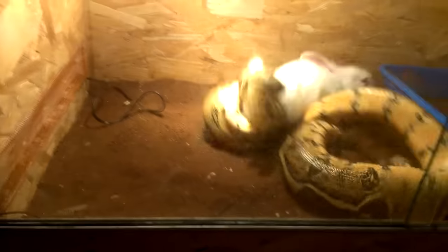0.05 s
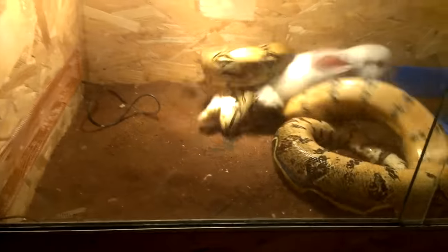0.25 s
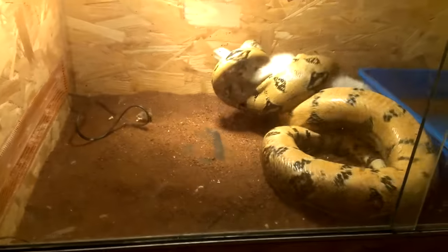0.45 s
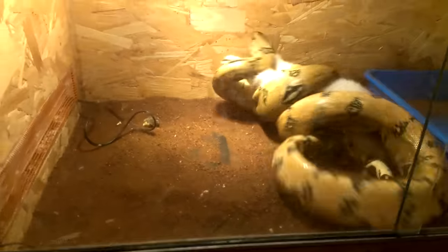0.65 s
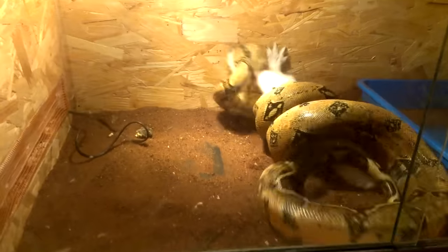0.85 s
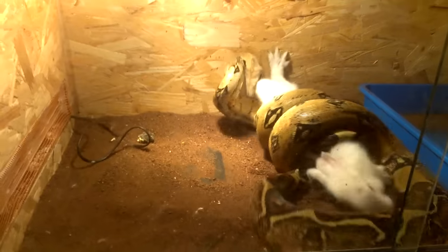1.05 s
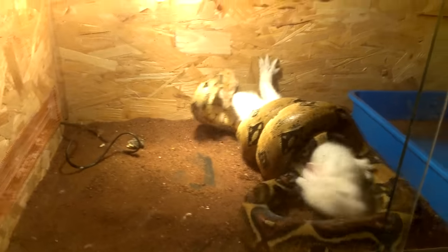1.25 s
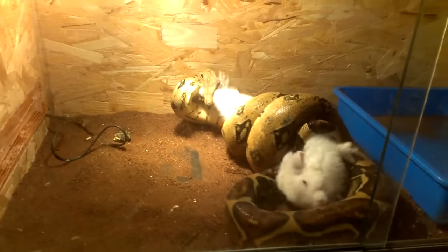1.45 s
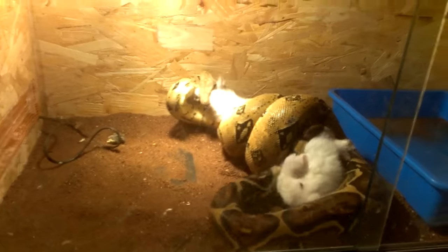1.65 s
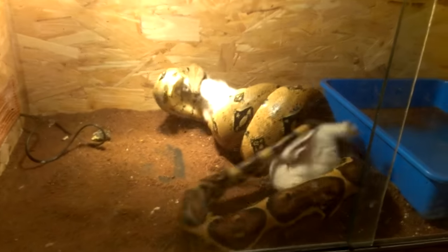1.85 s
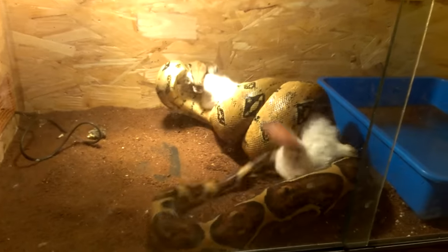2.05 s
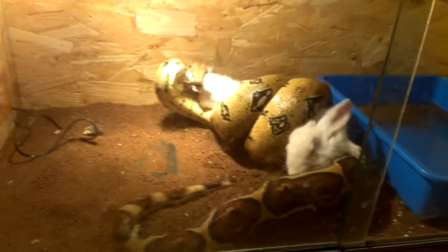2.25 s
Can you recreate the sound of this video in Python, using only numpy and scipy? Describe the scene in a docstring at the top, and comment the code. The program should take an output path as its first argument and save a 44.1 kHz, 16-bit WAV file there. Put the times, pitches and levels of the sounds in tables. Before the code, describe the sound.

A rabbit screams, a shrill squeal breaking into hoarse rasping cries, over faint thumps.

```python
"""A rabbit screaming in its enclosure

A whistling squeal glides around 3 kHz and breaks into a lower rasp, made of uneven voice pulses and air.
A second rasping cry follows and trails off in hoarse hisses. The close wood and glass walls echo the
cries, while the struggling rabbit thumps the boards and scuffs the bedding."""
import sys
import numpy as np
from scipy import signal
from scipy.fft import rfft, irfft
from scipy.io import wavfile
from scipy.ndimage import uniform_filter1d

SR = 44100
rng = np.random.default_rng(int(sys.argv[2]) if len(sys.argv) > 2 else 0)


def waveform_to_disk(signal):
    """Save audio, clipped to [-1, 1], as 16-bit WAV at the path in sys.argv[1]."""
    frames = np.transpose(np.atleast_2d(signal))
    scaled = np.clip(frames, -1, 1) * 32767
    samples = np.round(scaled).astype(np.int16)
    wavfile.write(sys.argv[1], SR, samples)


N = 101429
T = np.arange(N) / SR

# The squeal's tune. Each row: time in seconds, pitch in Hz.
SQUEAL_PITCH = [(.16, 2620), (.178, 3057), (.208, 3260), (.272, 3424), (.293, 3104), (.318, 3052),
                (.324, 2886), (.337, 2928), (.348, 3168), (.39, 2894), (.398, 2666), (.425, 2762),
                (.484, 3470), (.503, 3504), (.512, 3822), (.56, 4006), (.595, 4020), (.598, 3480),
                (.62, 3310), (.645, 2692), (.67, 2605), (.725, 3161), (.78, 3096)]
# The squeal's strength. Each row: time in seconds, then relative levels in dB near 3, 6 and 9 kHz.
SQUEAL_LEVELS = [(.157, -71, -55, -65), (.178, -54, -36, -57), (.228, -35.5, -34, -53.5),
                 (.27, -20, -22, -41), (.296, -38.5, -31, -38.5), (.335, -29, -18, -32.5),
                 (.364, -17, -37, -34), (.402, -41, -30.5, -57), (.445, -34, -36.5, -44),
                 (.492, -16, -38, -47), (.515, -32, -48, -29), (.575, -20.5, -31, -35.5),
                 (.59, -36, -43, -45), (.6, -20, -33, -42.5), (.625, -30.5, -34, -41.5),
                 (.69, -35.5, -23, -40), (.748, -24, -36.5, -36.5), (.762, -37, -33, -46)]
# Where those three bands blend, in Hz: low to middle (from, to), then middle to high (from, to).
BAND_EDGES_HZ = [4200, 5180, 6750, 7200]
# How rough the squeal is. Each row: time in seconds, roughness from 0 to 1.
SQUEAL_ROUGHNESS = [(.22, 0.28), (.27, 0), (.295, 0.23), (.335, 0.35), (.37, 0.05), (.45, 0.2), (.495, 0),
                    (.507, 0.74), (.575, 0.52), (.595, 0.8), (.61, 0.11), (.7, 0.29), (.75, 0.06)]
# The voice in each rasp. Each row: time in seconds, pitch in Hz, roughness from 0 to 1.
RASP1_VOICE = [(.755, 1206, 0.505), (0.799, 1047, 0.8), (0.83, 1077, 0.71), (.855, 912, .6),
               (0.878, 999.6, 0.32), (.903, 989.5, 0.39), (.925, 911.3, 0.53), (0.95, 1000, 0.53),
               (0.963, 948.5, 0.7), (0.983, 973, 0.32), (1.007, 904, 1), (1.04, 900, 0.85)]
RASP2_VOICE = [(1.369, 837.5, 0.74), (1.43, 759.3, 0.52), (1.466, 714.4, 0.59), (1.51, 819.8, 0.77),
               (1.559, 808, .8), (1.612, 802.7, 0.47), (1.645, 874.4, 0.51), (1.681, 945.7, 0.31),
               (1.709, 918.8, .17), (1.75, 924.7, 0.089), (1.766, 882, 0.34), (1.777, 844, 0.66),
               (1.83, 824, 0.78)]
# How the rasps, the hisses and their treble swell. Each row: time in seconds, relative level in dB.
RASP1_LEVEL = [(.748, -63), (.758, -29.5), (.838, -32.5), (.872, -28.5), (.956, -35), (.988, -29),
               (1.005, -37), (1.055, -41.5), (1.11, -75)]
RASP2_LEVEL = [(1.332, -72), (1.34, -39.5), (1.366, -33.5), (1.46, -29), (1.498, -28), (1.53, -28),
               (1.58, -33.5), (1.642, -30.5), (1.7, -34.5), (1.75, -30.5), (1.792, -31.5), (1.81, -54),
               (1.87, -72)]
HISS1_LEVEL = [(1.8, -32), (1.84, -39.5), (1.87, -45.5), (1.91, -38.5), (1.948, -37.5), (2.02, -45),
               (2.094, -57), (2.124, -49.5), (2.158, -93)]
HISS2_LEVEL = [(2.183, -88), (2.186, -46.5), (2.208, -42.5), (2.25, -54), (2.3, -45.5)]
TREBLE_LEVEL = [(1, 4.5), (1.1, -9), (1.35, 7.5), (1.48, 4), (1.8, -5), (2.13, 0.5), (2.19, -8.5),
                (2.25, 8)]
# The tone of the squeal's air and of the throat. Each row: frequency in Hz, relative level in dB.
AIR_TONE = [(2600, -26), (3400, 3.5), (5400, 4.5), (6500, -11.5), (10000, -20)]
RASP1_THROAT = [(1300, -25), (1900, -16.5), (2400, -9), (2850, 0.5), (3300, -8.5), (4200, 4.5), (4900, 4),
                (6600, -3.5), (7500, -18.5), (9000, -11), (10500, -28)]
RASP2_THROAT = [(900, -36.5), (1400, -46), (1850, -35), (2300, -31), (2800, -17), (3400, -3.5),
                (4200, -6.5), (4900, 0), (5650, -1.5), (6900, -18), (8700, -15.5), (10500, -25.5)]
HISS1_THROAT = [(1400, -50), (2800, -20), (4700, -5), (6300, -21.5), (7200, -20.5), (10500, -32.5)]
HISS2_THROAT = [(2300, -40), (3000, -20.5), (4800, -1), (6200, -17.5), (7700, -14.5), (10500, -31)]
# Brief whistles in the rasps. Each row: start and length in seconds, first and last pitch in Hz,
# relative level in dB, roughness from 0 to 1.
YELPS = [(0.752, 0.038, 4806, 4640, -26.5, 0.36), (0.785, 0.027, 4510, 4120, -32, 0.56),
         (1.027, 0.096, 2305, 2045, -68, .5), (1.346, 0.033, 2880, 3260, -43, .3),
         (1.373, 0.045, 3500, 3555, -34.5, 0.2), (1.43, 0.043, 5630, 5710, -32, 0.43),
         (1.472, 0.053, 4926, 4790, -25.5, 0.6), (1.615, .042, 4680, 5370, -32.5, 0.27)]
# Kicks on the boards. Each row: start in seconds, boom, knock and scuff levels in dB,
# seconds for the knock and scuff to fade by 60 dB.
KICKS = [(0.086, -50, -42.5, -69, 0.26), (0.23, -44.5, -41, -58, 0.14), (.31, -58.5, -72.5, -60.5, 0.34),
         (0.424, -27.5, -45, -88, 0.2), (0.561, -45.5, -63.5, -68, 0.15), (.782, -35.5, -35.5, -37.5, 0.24),
         (1.175, -78, -59, -67.5, 0.11)]
# The notes the boards ring at. Each row: frequency in Hz, relative level in dB, seconds to fade by 60 dB.
BOARD_NOTES = [(97.1, -7.5, 0.3), (166.3, -17, 0.097), (286.9, -5.5, 0.2), (381, -8, 0.13),
               (497.6, 3.5, 0.21), (720, 0, 0.23), (835, -6.5, 0.22), (1064, -7, 0.2)]
# Sharp scratches in the bedding. Each row: start in seconds, level in dB, seconds to fade by 60 dB.
SCRATCHES = [(.086, -41.5, 0.098), (1.319, -58, 0.093)]
# Shifting on the floor and rustling in the bedding. Each row: time in seconds, relative level in dB.
SHUFFLE_LEVEL = [(0, -45.5), (.3, -50.5), (.7, -57), (1.17, -58), (1.48, -61), (1.65, -77), (2.3, -79)]
BEDDING_LEVEL = [(0, -60.5), (.07, -66.5), (.2, -59.5), (1.25, -70.5), (2.3, -68.5)]
# The tone of each noise of the struggle. Each row: frequency in Hz, relative level in dB.
KNOCK_TONE = [(50, -17), (120, 2.5), (230, 4.5), (330, 4), (450, -17), (700, -27.5), (1500, -18),
              (4000, -58.5)]
SCUFF_TONE = [(200, -20.5), (450, 7.5), (800, 5.5), (1200, -2), (2000, -3), (5000, -21.5), (10000, -55.5)]
SHUFFLE_TONE = [(30, -20), (70, -0.5), (105, -2), (145, -4.5), (290, -9.5), (1200, -27.5), (4000, -46.5)]
BEDDING_TONE = [(300, -4), (2500, -4.5), (4700, 7), (6500, -7.5), (10000, -25)]
# Echoes off the walls. Each row: delay in seconds, level in dB compared with the direct sound.
WALL_ECHOES = [(.0013, -24), (.0029, -16.5), (.0047, -10), (.0071, -5)]

WOBBLE_HZ, FLUTTER_HZ = 70.46, 161  # how fast the pitch wobbles and the loudness flutters
THROAT_LOW_HZ = 1210  # the throat's sound falls away below this


def squeal(gain_db=-2, air_db=0.5, end_s=0.758, release_s=0.013, shimmer_hz=284):
    """A whistle with three harmonics, shaken in pitch and strength and joined by air as it turns rough."""
    rough, hz = curve(SQUEAL_ROUGHNESS), curve(SQUEAL_PITCH)
    phase = whistle_phase(hz, rough)
    gate = (T >= SQUEAL_LEVELS[0][0]) * (T < end_s) + decay(end_s, release_s)
    low, mid, high = (undb(curve(SQUEAL_LEVELS, column=k)) for k in range(1, 4))
    whistle = 0
    for k in range(1, 4):
        past_low = np.interp(k * hz, BAND_EDGES_HZ[:2], [0, 1])
        past_mid = np.interp(k * hz, BAND_EDGES_HZ[2:], [0, 1])
        gain = low * (1 - past_low) + mid * (past_low - past_mid) + high * past_mid
        shake = k * 0.2 * rough  # higher harmonics flutter most
        shimmer = 1 + shake * np.tanh(wander(shimmer_hz))
        whistle += gain * np.sqrt(2 / (1 + shake ** 2 / 2)) * np.sin(k * phase) * shimmer
    air = noise(AIR_TONE, low_hz=2560) * low * rough ** 2
    return (undb(gain_db) * whistle + undb(air_db) * air) * gate


def whistle_phase(hz, rough, jitter_hz=368):
    """The phase of a whistle whose pitch always wobbles a little, and jolts and jitters when rough."""
    wobble = (0.0088 + 0.03 * rough) * wander(WOBBLE_HZ)
    jitter = 0.05 * rough * wander(jitter_hz)
    return 2 * np.pi * np.cumsum(hz * (1 + wobble + jitter)) / SR


def rasp(level, voice, throat, gain_db, flutter_db=4, jitter_hz=260.8, clear_db=13.5):
    """Uneven pulses and puffs of air ring the throat; the rougher the voice, the more air."""
    rough = np.clip(curve(voice, column=2), 0, 1)
    wobble = 0.022 * rough * wander(WOBBLE_HZ)
    jitter = 0.028 * rough ** 1.505 * wander(jitter_hz)  # steadies quickly as roughness falls
    phase = 2 * np.pi * np.cumsum(curve(voice) * (1 + wobble + jitter)) / SR
    clearness = np.clip(1 - rough / 0.46, 0, 1)
    third = undb(clear_db) * clearness * np.cos(3 * phase) / 2  # this harmonic stands out when clear
    pulses = sum(np.cos(k * phase) for k in range(1, 14)) + third
    puffs = rng.standard_normal(N) * (1 + 0.8 * np.cos(phase))
    air_share = rough ** 0.89
    voiced = np.sqrt(1 - air_share ** 2) * colour(pulses, throat, THROAT_LOW_HZ)
    air = air_share * colour(puffs, throat, THROAT_LOW_HZ)
    flutter = undb(flutter_db * rough * np.tanh(wander(FLUTTER_HZ)))
    return unit((voiced + air) * flutter) * envelope(level) * undb(gain_db)


def yelps(fade_s=0.011):
    """The whistle breaks through the rasp in short glides."""
    out = 0
    for start, length, first_hz, last_hz, db, rough in YELPS:
        hz = np.interp(T, [start, start + length], [first_hz, last_hz])
        gate = np.clip(np.minimum(T - start, start + length - T) / fade_s, 0, 1)
        out += np.sqrt(2) * undb(db) * gate * np.sin(whistle_phase(hz, rough))
    return out


def hiss(level, throat, gain_db, flutter_db):
    """The voice fails and only fluttering air sounds in the throat."""
    air = rng.standard_normal(N) * undb(flutter_db * wander(FLUTTER_HZ))
    return colour(air, throat, THROAT_LOW_HZ) * envelope(level) * undb(gain_db)


def swell_treble(x, above_hz=6450):
    """The treble of the rasps and hisses swells and fades."""
    treble = signal.sosfiltfilt(signal.butter(4, above_hz, "high", fs=SR, output="sos"), x)
    return x + (undb(curve(TREBLE_LEVEL)) - 1) * treble


def kicks(boom_hz=99, boom_fade_s=0.063, push_s=0.0028, hard_hz=400):
    """Each kick booms the floor, knocks and rings the boards and scuffs the bedding."""
    out, knock, scuff = 0, noise(KNOCK_TONE), noise(SCUFF_TONE)
    for start, boom_db, knock_db, scuff_db, fade_s in KICKS:
        age = np.maximum(T - start, 0)
        boom = undb(boom_db) * np.sin(2 * np.pi * boom_hz * age) * decay(start, boom_fade_s)
        ring = 0
        for hz, db, ring_s in BOARD_NOTES:
            hit_db = scuff_db if hz > hard_hz else knock_db  # high notes need a hard, scuffing kick
            ring += undb(db + hit_db) * np.sin(2 * np.pi * hz * age) * decay(start, ring_s)
        crunch = (undb(knock_db) * knock + undb(scuff_db) * scuff) * decay(start, fade_s)
        out += (boom + ring + crunch) * (1 - np.exp(-age / push_s))
    return out


def shuffle(gain_db=-11.5, ring_db=2.5, width_hz=14, patchy_db=3.0):
    """The body shifts on the boards, which rumble and hum at their own notes."""
    rub = rng.standard_normal(N)
    ring = sum(signal.lfilter(*signal.iirpeak(hz, hz / width_hz, fs=SR), rub) for hz, _, _ in BOARD_NOTES)
    boards = noise(SHUFFLE_TONE) + undb(ring_db) * colour(ring, SHUFFLE_TONE)
    return boards * undb(curve(SHUFFLE_LEVEL) + gain_db + patchy_db * wander(hz=12))


def bedding(patchy_db=3.0):
    """The bedding rustles unevenly under the body, with two sharp scratches."""
    rustle = noise(BEDDING_TONE) * undb(curve(BEDDING_LEVEL) + patchy_db * wander(hz=33))
    scratches = sum(undb(db) * decay(start, fade_s) for start, db, fade_s in SCRATCHES)
    return rustle + noise(BEDDING_TONE) * scratches


def enclosure(x, tail_db=-4, tail_fade_s=0.22, gain_db=-2):
    """The close walls add a few quick echoes and a short, dense tail."""
    response = rng.standard_normal(N) * decay(0.0021, tail_fade_s)
    response *= undb(tail_db) / np.sqrt(np.sum(response ** 2))
    response[0] += 1  # the direct sound
    for delay, db in WALL_ECHOES:
        response[int(delay * SR)] += undb(db)
    return signal.fftconvolve(x, response)[:N] * undb(gain_db)


def undb(db):
    """Turn decibels into a gain to multiply by."""
    return 10 ** (np.asarray(db) / 20)


def unit(x):
    """Scale to an average strength (rms) of 1."""
    return x / np.sqrt(np.mean(x ** 2) + 1e-30)


def curve(rows, column=1):
    """One column of a table, joined by straight lines in time."""
    rows = np.array(rows, float)
    return np.interp(T, rows[:, 0], rows[:, column])


def envelope(rows):
    """Gain from a dB curve, silent outside it."""
    inside = (T >= rows[0][0]) & (T <= rows[-1][0] + .01)
    return undb(curve(rows)) * uniform_filter1d(inside * 1., size=128)


def wander(hz):
    """A smooth random wiggle of strength 1, with speeds up to about hz."""
    f = np.arange(N // 2 + 1) * SR / N
    return unit(irfft(rfft(rng.standard_normal(N)) / np.sqrt(1 + (f / hz) ** 8), N))


def colour(x, tone, low_hz=20):
    """Shape a sound by a tone table, thin it below low_hz and scale it to strength 1."""
    f = np.arange(N // 2 + 1) * SR / N + 1
    hz, db = np.array(tone, float).T
    gain = undb(np.interp(np.log(f), np.log(hz), db)) / np.hypot(1, (low_hz / f) ** 2)
    return unit(irfft(rfft(x) * gain, N))


def noise(tone, low_hz=20):
    """Noise of strength 1, shaped by a tone table."""
    return colour(rng.standard_normal(N), tone, low_hz)


def decay(start, fade_s):
    """A sudden start, then a fall of 60 dB every fade_s seconds."""
    return (T >= start) * np.exp(-np.log(1000) * np.maximum(T - start, 0) / fade_s)


def scene():
    """The echoing cries over the sounds of the struggle, in one channel."""
    rasps = rasp(RASP1_LEVEL, RASP1_VOICE, RASP1_THROAT, gain_db=-3.5)
    rasps += rasp(RASP2_LEVEL, RASP2_VOICE, RASP2_THROAT, gain_db=-0.18)
    hisses = hiss(HISS1_LEVEL, HISS1_THROAT, gain_db=-5.5, flutter_db=1.5)
    hisses += hiss(HISS2_LEVEL, HISS2_THROAT, gain_db=1.0, flutter_db=3.0)
    cries = squeal() + yelps() + swell_treble(rasps + hisses)
    return (enclosure(cries) + kicks() + shuffle() + bedding())[None]


def record(dry, low_cut_hz=54, top_hz=10550):
    """The recorder thins the deep bass and cuts the highest treble steeply."""
    thin = signal.sosfilt(signal.butter(4, low_cut_hz, "high", fs=SR, output="sos"), dry)
    return signal.sosfilt(signal.ellip(12, .2, 80, top_hz, fs=SR, output="sos"), thin)


dry = scene()
out = record(dry)
waveform_to_disk(out)
```